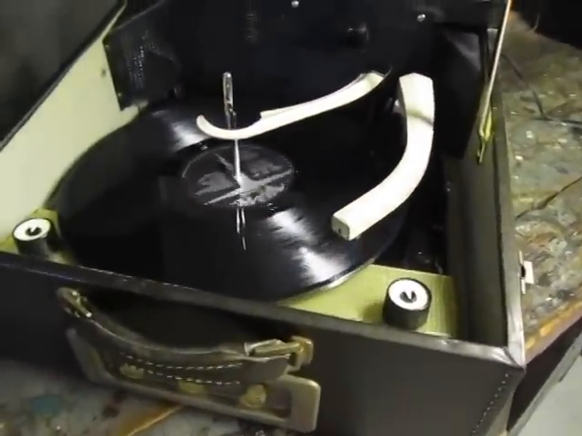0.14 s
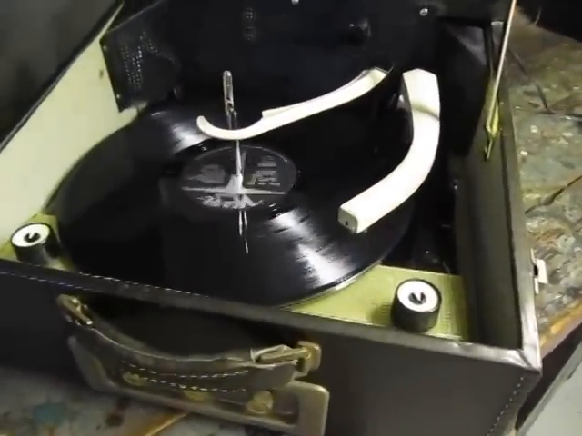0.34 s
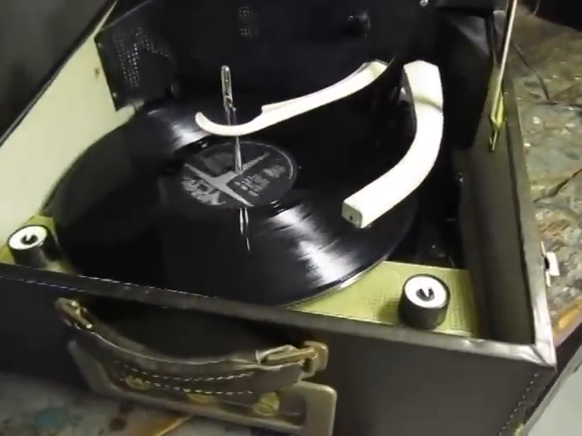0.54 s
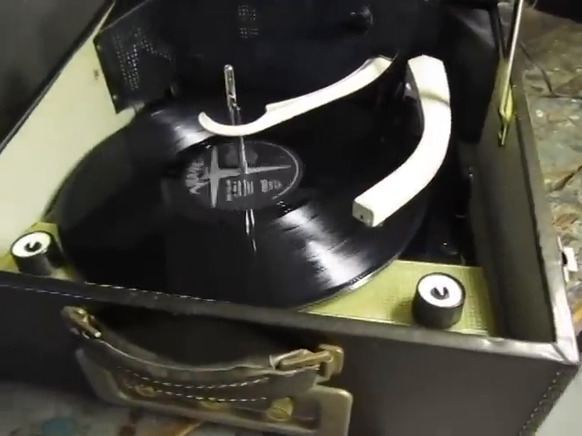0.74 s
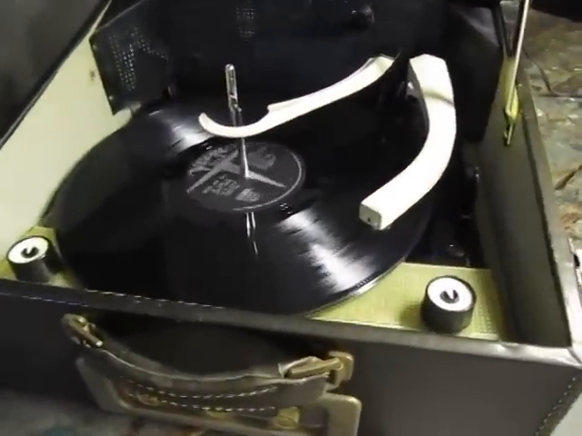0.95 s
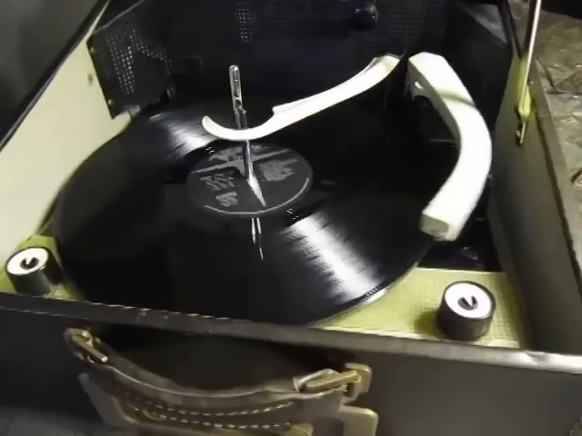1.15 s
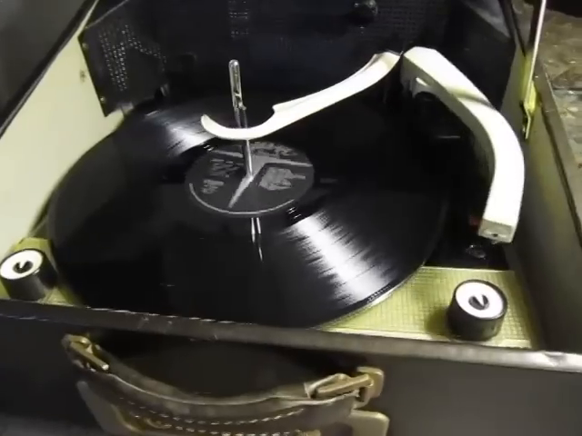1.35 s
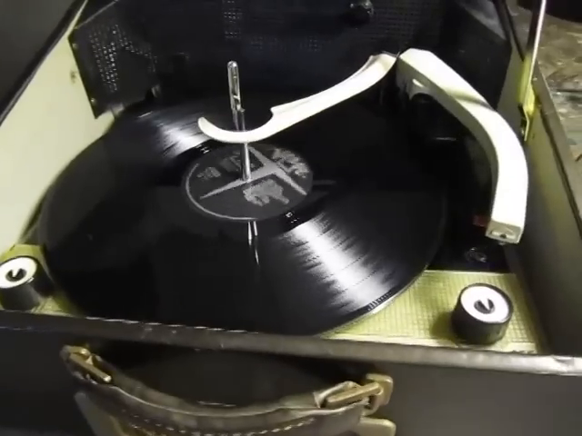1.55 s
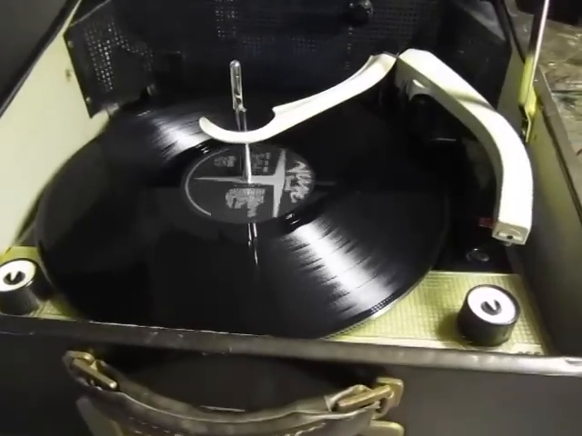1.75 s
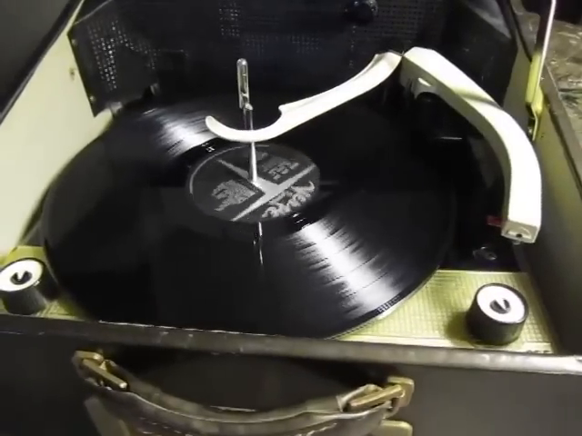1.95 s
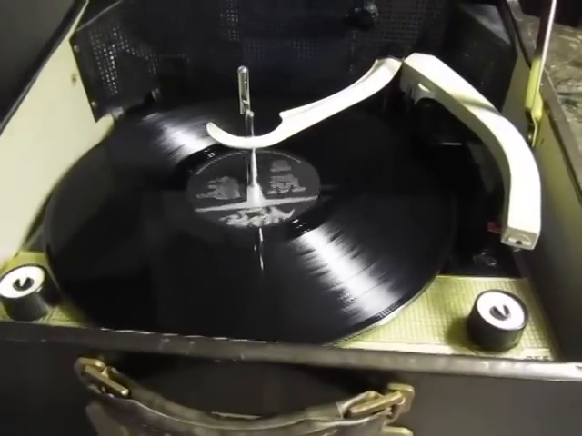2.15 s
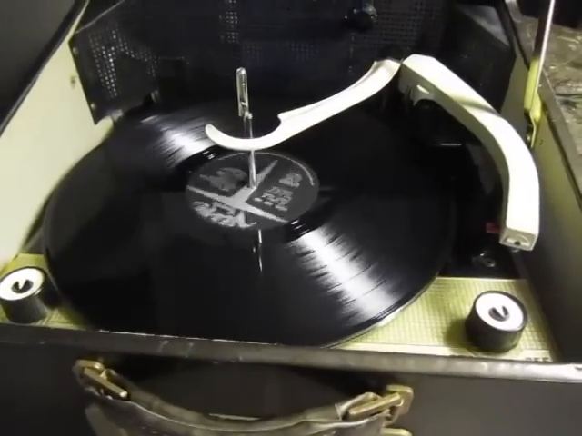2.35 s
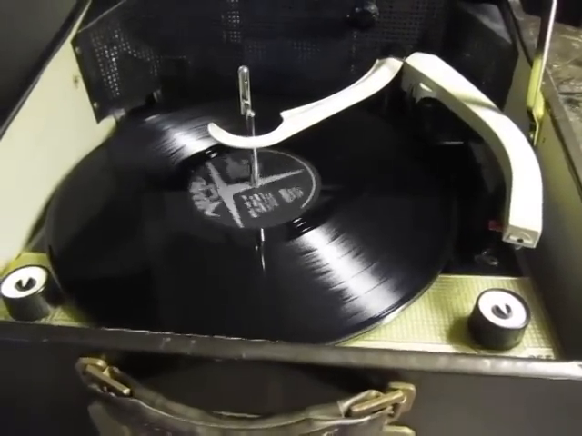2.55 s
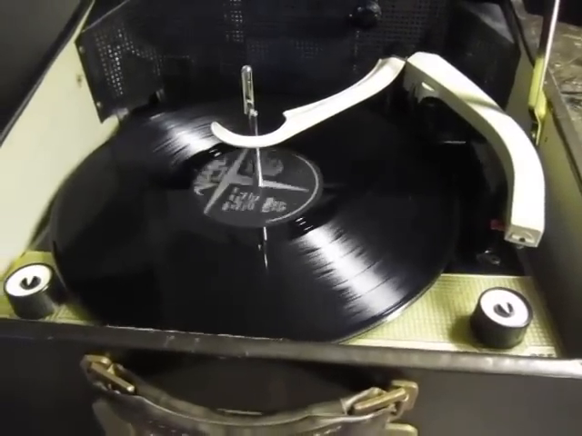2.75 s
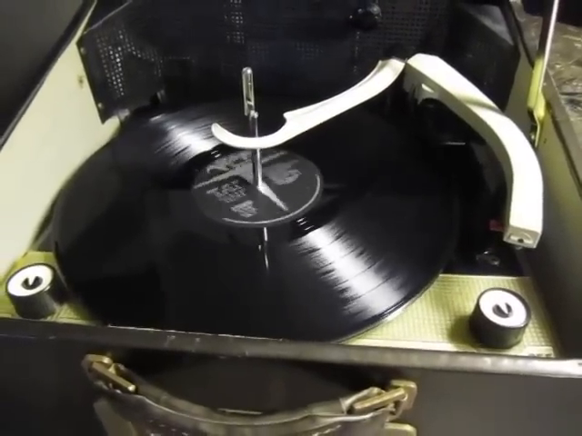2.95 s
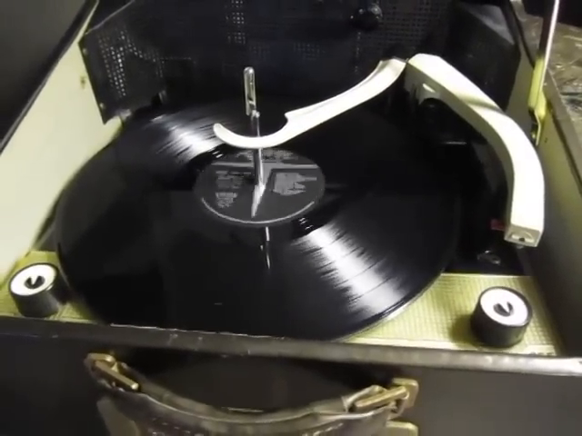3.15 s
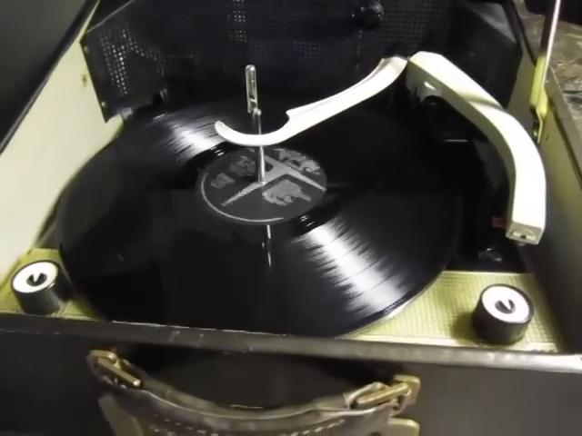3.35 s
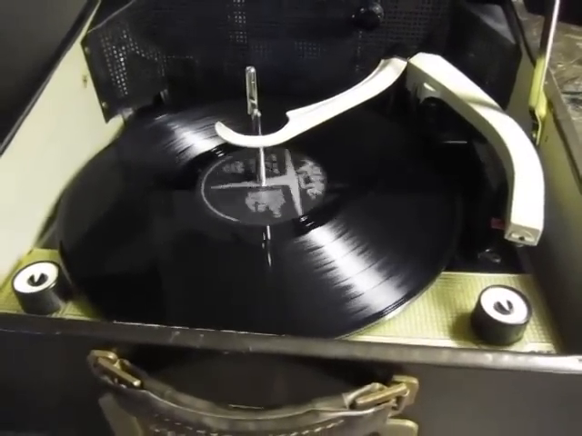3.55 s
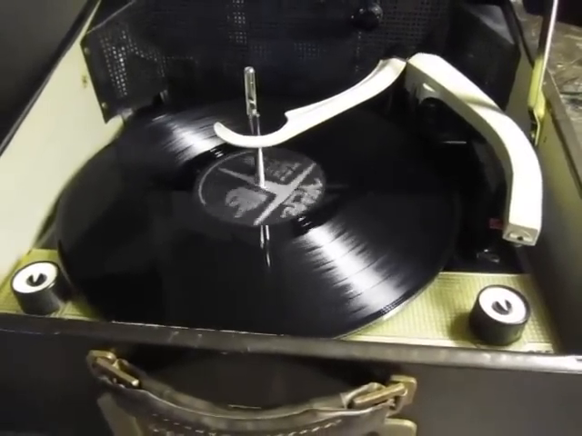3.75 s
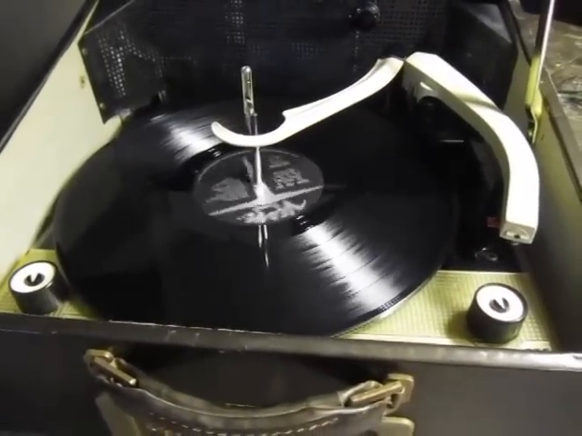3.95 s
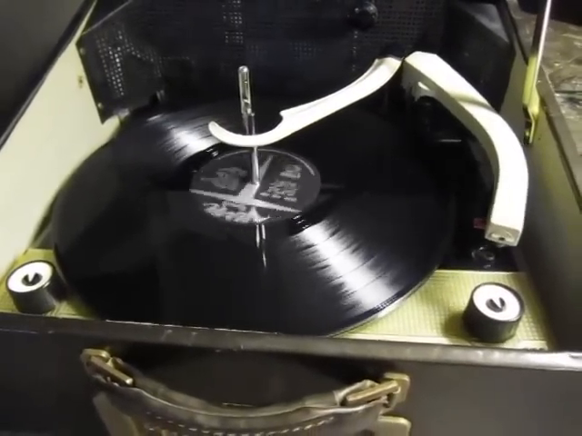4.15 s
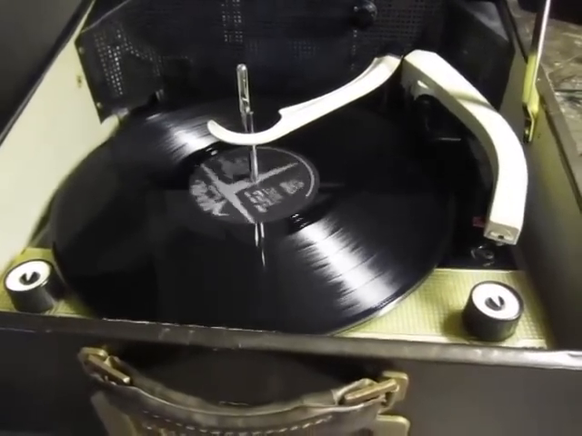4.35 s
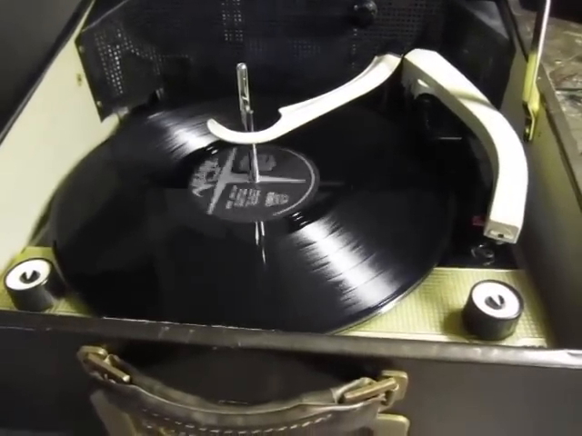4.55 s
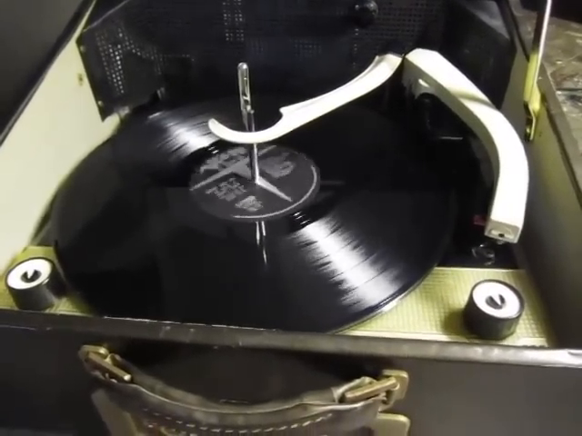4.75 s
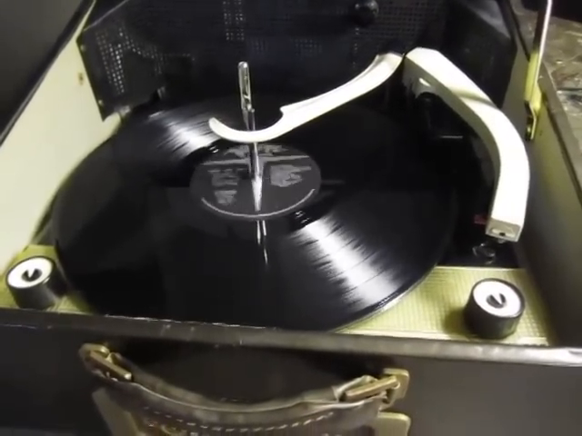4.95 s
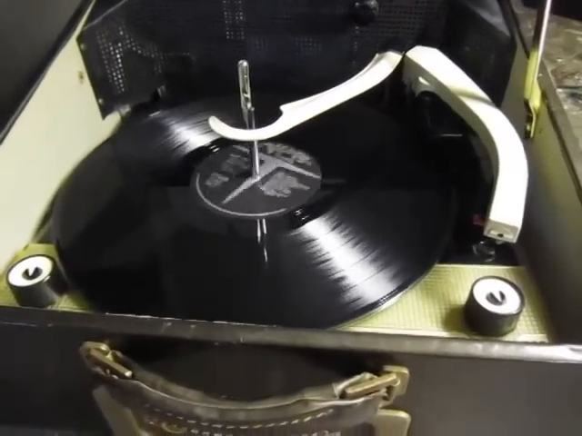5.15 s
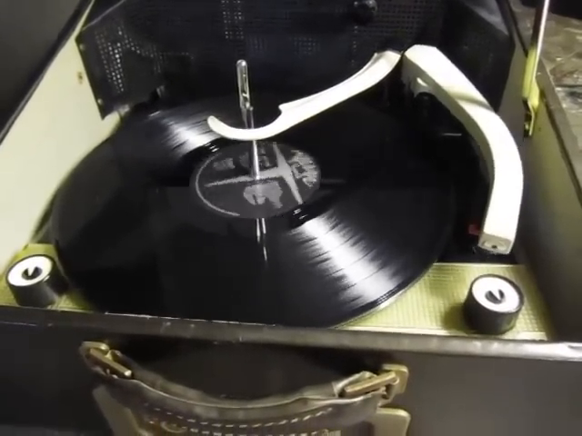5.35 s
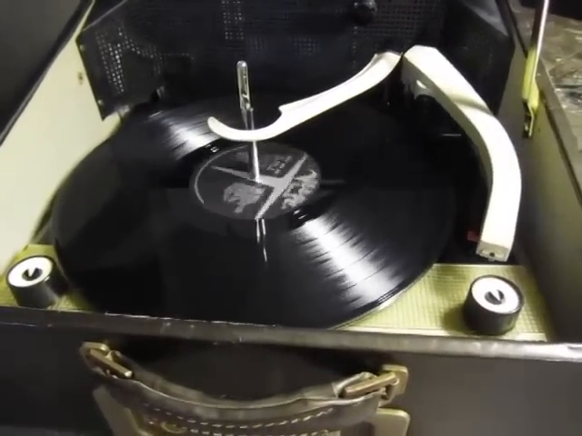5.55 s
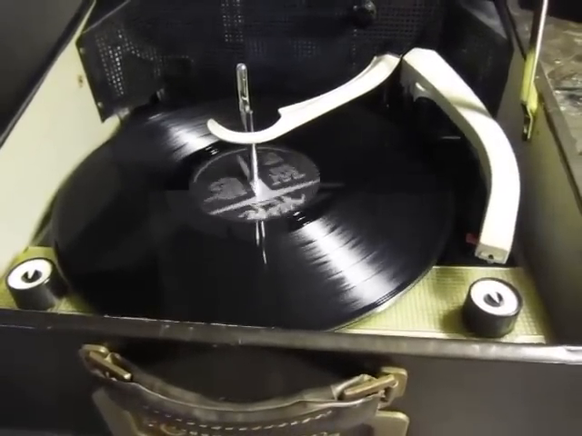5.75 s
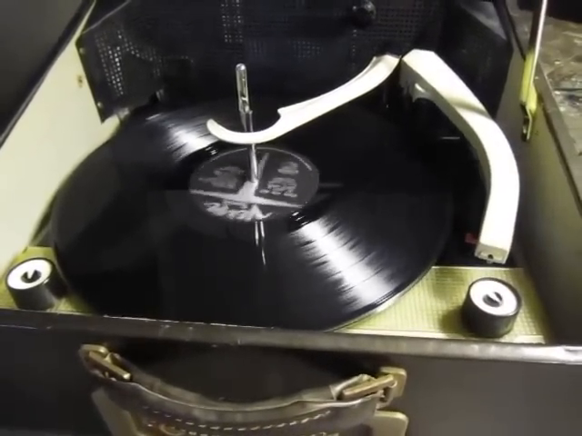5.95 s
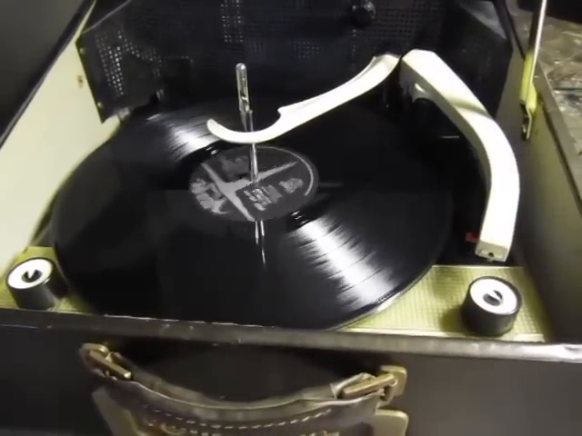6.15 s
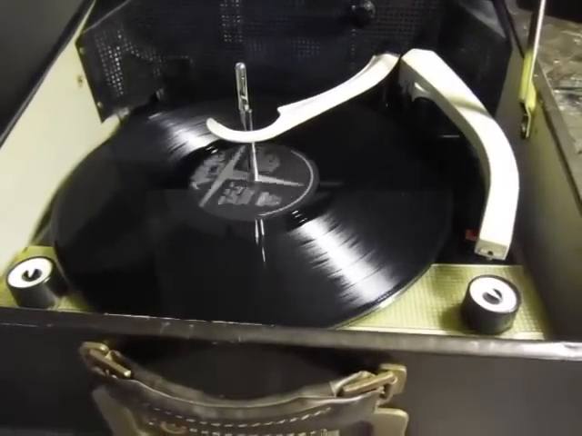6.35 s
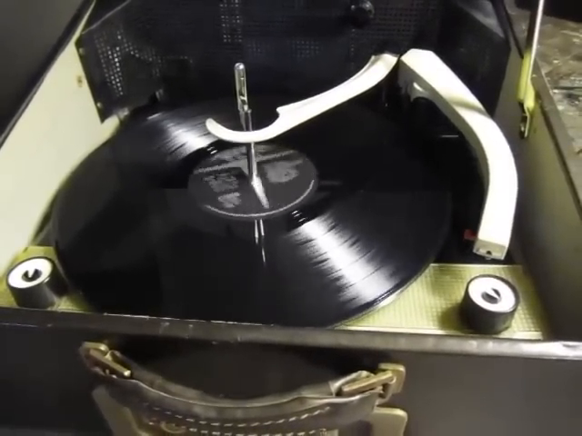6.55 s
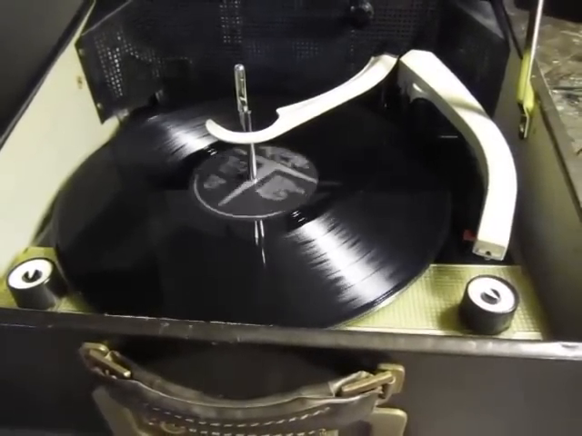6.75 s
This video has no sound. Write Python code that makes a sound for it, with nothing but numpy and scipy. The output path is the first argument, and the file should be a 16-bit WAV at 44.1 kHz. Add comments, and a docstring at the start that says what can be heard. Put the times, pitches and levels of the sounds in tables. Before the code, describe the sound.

Close mechanical clicking of a record changer over low hum and rumble, ending in a hard ringing switch snap, quiet, and small late rattles.

```python
"""Lever contacts of a record changer in a portable case: brief noisy impacts excite the steel deck's modes.
The stylus hiss ends, the arm swings to its rest, and cam, pawls and levers click as the cycle finishes.
Motor hum is a sum of mains harmonics; rumble, scrapes and stylus hiss are filtered noise.
The shut-off lever snaps and rings, the motor stops, and springs and rods ring on as decaying partials.
The coasting platter nudges a last few levers over a faint low room tone."""
import sys
import numpy as np
from scipy import signal
from scipy.fft import rfft, irfft, next_fast_len
from scipy.io import wavfile
from scipy.ndimage import uniform_filter1d, map_coordinates

SR = 44100
rng = np.random.default_rng(int(sys.argv[2]) if len(sys.argv) > 2 else 0)


def put_to_file(sound):
    """Save the sound as 16-bit audio at rate SR, in the file named by the first command-line argument."""
    columns = np.atleast_2d(sound).T  # one column per channel
    safe = np.clip(columns, -1, 1)
    whole_steps = np.round(safe * 32767)
    wavfile.write(sys.argv[1], SR, whole_steps.astype(np.int16))


N = 300214  # length in samples
TRIP_S = 5.984  # the shut-off lever strikes


def amp(db):
    """Level law: decibels to amplitude gain."""
    return 10 ** (np.asarray(db) / 20)


def unit(x):
    """Normalization: scale a signal to rms 1."""
    return x / np.sqrt(np.mean(x ** 2) + 1e-20)


def along(points, hz):
    """Spectral interpolation: (Hz, value) points read on a logarithmic frequency axis."""
    f, v = np.transpose(points)
    return np.interp(np.log(hz + 1), np.log(f + 1), v)


def curve(rows):
    """Envelope interpolation: (s, value) rows as one value per sample."""
    return np.interp(np.arange(N) / SR, *np.transpose(rows))


def wobble(rate):
    """Random modulation: a smooth curve through rate random knots a second."""
    knots = rng.standard_normal(int(N * rate / SR) + 4)
    fine = np.arange(len(knots) * 8) / 8
    smooth = map_coordinates(knots, [fine], mode="nearest")
    return np.interp(np.arange(N) * rate / SR, fine, smooth)


def filtered(x, response):
    """Linear filtering: the spectrum of x times a response of frequency."""
    n = x.shape[-1]
    m = next_fast_len(n + 8192)  # padded so that the tail does not wrap round
    return irfft(rfft(x, m) * response(np.fft.rfftfreq(m, 1 / SR)), m)[..., :n]


def noise(spectrum):
    """Spectral shaping: white noise through a gain of (Hz, dB) points."""
    return filtered(rng.standard_normal(N), lambda hz: amp(along(spectrum, hz)))


def resonances(modes, hz):
    """Damped resonance: summed causal band-pass responses of (Hz, width in Hz, dB) modes."""
    return sum(amp(db) * 1j * hz * w / (c * c - hz * hz + 1j * hz * w) for c, w, db in modes)


def ring(modes, attack):
    """Free vibration: a second of exponentially decaying (Hz, dB, t60) partials."""
    t = np.arange(SR) / SR
    partials = 0
    for hz, db, t60 in modes:
        partials = partials + amp(db - 60 * t / t60) * np.sin(2 * np.pi * (hz * t + rng.random()))
    return partials * (1 - np.exp(-t / attack))


def add(track, s, sound):
    """Superposition: mix a sound into a track from time s."""
    start = max(round(s * SR), 0)
    part = sound[..., :N - start]
    track[..., start:start + part.shape[-1]] += part


def stereo(mid, side):
    """Mid-side stereophony: left and right from the common and the opposed part."""
    return np.array([mid + side, mid - side])


# mains harmonics: pitch_hz [Hz], loaded_db [dB rms before wavering], idle_change_db [dB]
HUM_LINES = [(59.9, -66, -8.5), (118.5, -67, -4), (178.6, -59, -9.5), (235, -71, -3), (539, -66, -12),
             (597, -64, .3)]


def motor(waver_db=1.23, waver_rad=0.18, load_s=1.2, stop_s=0.043):
    """Magnetic hum: wavering mains harmonics, most of them rising under the cam's load until the switch cuts them."""
    t = np.arange(N) / SR
    idling = np.clip(1 - t / load_s, 0, 1)
    lines = 0
    for hz, db, idle_db in HUM_LINES:
        size = amp(db + idle_db * idling + waver_db * wobble(5))
        phase = 2 * np.pi * (hz * t + rng.random()) + waver_rad * wobble(7.7)
        lines = lines + size * np.sin(phase)
    return np.sqrt(2) * lines * np.exp(-np.maximum(t - TRIP_S, 0) / stop_s)


# common part of the rumble's colour: frequency_hz [Hz], relative_db [dB]
RUMBLE_COLOUR = [(25, -25.5), (60, -15.5), (130, -4), (175, -1.5), (290, 2), (420, -3), (650, -3),
                 (1000, -6), (1400, -9.5), (3450, -16), (3720, -23.5), (6000, -21), (9000, -31),
                 (15500, -53.5)]
# diffuse, opposed part of the rumble's colour: frequency_hz [Hz], relative_db [dB]
DIFFUSE_COLOUR = [(25, -20), (60, 1), (170, 11), (280, 9), (500, 3.5), (800, -3), (1500, -9.5),
                  (3400, -19.5), (3750, -27.5), (5800, -22), (9000, -31), (15500, -57.5)]
ENGAGE_S = 1.33  # the cam has taken up its full load
# relative rumble while playing, turning the cam, and coasting
IDLE_DB, LOADED_DB, COAST_DB = -58, -52, -59.5


def drive(level_db=-0.5, flutter_db=1.0, take_up=2.6, run_down_s=0.04, bass_hz=190):
    """Rolling noise: idler, bearing and cam rumble louder under load, then fade and lose bass after shut-off."""
    t = np.arange(N) / SR
    driven = np.exp(-np.maximum(t - TRIP_S, 0) / run_down_s)
    running_db = IDLE_DB + (LOADED_DB - IDLE_DB) * np.minimum(t / ENGAGE_S, 1) ** take_up
    rumble_db = COAST_DB + (running_db - COAST_DB) * driven
    near, diffuse = noise(RUMBLE_COLOUR), noise(DIFFUSE_COLOUR)
    # only the common part is uneven; the wide rush is steady
    rumble = stereo(near * amp(flutter_db * wobble(45)), diffuse) / np.std(near)
    coasting = filtered(rumble, lambda hz: hz ** 2 / (hz ** 2 + bass_hz ** 2))
    return amp(rumble_db + level_db) * (driven * rumble + (1 - driven) * coasting)


# stylus hiss: time_s [s], level_db [dB rms]
GROOVE_HISS = [(0, -74.5), (.95, -68), (1.03, -70), (1.2, -110)]


def stylus(needle_hz=3390, width_hz=260):
    """Resonant excitation: groove noise drives the needle's resonance until the arm lifts."""
    hiss = filtered(rng.standard_normal(N), lambda hz: resonances([(needle_hz, width_hz, 0)], hz) ** 2)
    return amp(curve(GROOVE_HISS)) * unit(hiss)


# filter gain of the low room rumble: frequency_hz [Hz], gain_db [dB]
ROOM_RUMBLE = [(25, -65.5), (130, -49.5), (250, -54), (900, -110)]


def room_tone():
    """Diffuse background: independent low noise in each channel, which stays when the motor has stopped."""
    return np.array([noise(ROOM_RUMBLE), noise(ROOM_RUMBLE)])


# lever contacts: time_s [s], strength_db [relative dB], hardness [0-1], case_thump_db [relative dB],
# peak_delay_s [s, rise of the chatter], part_pitch_hz [Hz, the struck part], part_prominence_db [dB]
LEVER_CONTACTS = [(1.002, -44, 0.66, -50, 0.0043, 2900, 1), (1.027, -41, 0.57, -52, .0026, 2900, 5.5),
                  (1.031, -51, .4, -38.5, 0.0026, 270, 12), (1.111, -51, 0.11, -65, 0.0011, 930, 5.5),
                  (1.166, -46.5, 0.34, -54, .002, 780, 7.5), (1.214, -24, 0.77, -30, 0.003, 740, 10.5),
                  (1.2223, -23.5, 0.86, -26, 0.0031, 544, 13.5),
                  (1.236, -43, 0.5, -32.5, 0.0028, 130, 12.5), (1.264, -35, .76, -34, .004, 1620, 9),
                  (1.308, -28, 0.94, -39, 0.0041, 560, 14.5), (1.394, -37, 0.65, -42, 0.0049, 1930, 4),
                  (1.4362, -41, 0.88, -45, 0.0018, 1990, 5), (1.4513, -33.5, 0.84, -35.5, 0.0017, 1950, 7),
                  (1.629, -41, 0.84, -50, 0.004, 1900, 12), (1.654, -39, 0.86, -49, 0.0019, 2590, 6),
                  (1.724, -26.5, .91, -47, 0.0036, 1580, 0.5), (1.931, -42, 0.76, -57, 0.0018, 2490, 10),
                  (2.8657, -38, 0.86, -43, 0.0031, 1010, 12), (3.329, -38.5, 0.62, -42, 0.0037, 890, 12),
                  (3.8458, -45, 0.15, -48, 0.0014, 990, 9.5), (4.049, -45.5, 0.37, -45, 0.0033, 1020, 5.5),
                  (4.098, -39, 0.42, -41, 0.0019, 170, 9.5), (4.1318, -49, 0.84, -38, 0.0084, 574, 17),
                  (4.1605, -40, 0.22, -40, 0.0012, 1450, 5.5), (4.17, -43, 0.27, -40, 0.0034, 660, 11),
                  (4.372, -53, 0.04, -65, 0.0017, 850, 8.5), (4.4307, -18.5, 0.92, -44, 0.0049, 7500, 9.5),
                  (4.4418, -15.5, 0.83, -38.5, 0.0043, 340, 11), (4.4436, -25, 0.22, -49, 0.002, 980, 7.5),
                  (4.46, -27, 0.94, -40, 0.0027, 1560, 8), (4.9393, -33.5, 0.88, -64.5, 0.0055, 4540, 5.5),
                  (5.147, -32, 0.79, -31.5, 0.0019, 1540, 12), (5.336, -29.5, 0.59, -43, 0.0035, 977, 4),
                  (5.343, -32.5, 0.6, -59.5, 0.002, 1850, 13),
                  (5.511, -46.5, 0.78, -50.5, 0.0024, 2570, 14),
                  (5.6823, -43.5, 0.45, -51.5, 0.0024, 1640, 9),
                  (5.7787, -28, 0.51, -45, 0.0052, 1720, 12.5), (5.9837, -17, 0.9, -37, 0.0013, 1035, -0.5),
                  (5.9857, -5, 0.91, -36, 0.0019, 2900, 5.5), (5.9935, -17, 0.81, -37.5, 0.0033, 1035, 3.5),
                  (6.004, -29, 1, -45.5, 0.0028, 6000, 4.5), (6.028, -30.5, 1, -59, 0.0048, 6500, 2),
                  (6.54, -24.5, 0.79, -66, 0.0043, 3150, 6), (6.569, -32, 0.7, -68.5, 0.005, 1750, 14),
                  (6.582, -26, 0.75, -63.5, 0.0032, 1790, 10),
                  (6.6769, -37.5, 0.75, -46, 0.0026, 806, 14.5), (6.687, -57.5, 0.1, -61.5, .004, 280, 20)]
# deck and case resonances: pitch_hz [Hz], relative_db [dB], t60_s [s]
DECK_MODES = [(120, -19, 0.072), (176, -7.5, 0.081), (269.8, -3.5, .08), (562, -8, 0.041), (715, -6, 0.066),
              (806, -0.5, .03), (984, -1, 0.039), (1270, -7.5, 0.022), (1467, -2.5, 0.072),
              (1688, -5.5, .03), (1888, 1.5, 0.056), (2335, -1, 0.045), (2500, -1, 0.039), (2577, 0.5, .04),
              (2880, -3, 0.037), (3180, -6.5, 0.042), (4600, -15, 0.084), (5060, -7, 0.055),
              (5190, -5, .035), (5506, -7, .05), (6250, -1, 0.025), (7100, -11, .04), (7570, -7, 0.033),
              (8400, -12.5, .04)]
# colour of the unpitched part of a contact: frequency_hz [Hz], relative_db [dB]
CHATTER_COLOUR = [(30, -10.5), (120, 3.5), (400, 8), (900, 18.5), (3200, 17), (3900, 8), (6500, 15),
                  (8500, 6.5), (11500, -0.5), (13500, -14.5), (15500, -22.5)]
# dull knock and bright snap relative to the strength, at hardness 0 and 1
SOFT_KNOCK_DB, HARD_KNOCK_DB = 6, -17.5
SOFT_SNAP_DB, HARD_SNAP_DB = -57.5, -4


def contacts(lead_s=.0024, vary_db=3.0, thump_db=-4, clack_db=-9.5, shine_db=-9, shine_gain=0.097,
             shine_rise_db=36, rebound_s=.014, rebound_db=-17, part_width=0.17, detune=0.0073):
    """Impact excitation: chatter rings deck and struck part; returns whole blows and unpitched chatter alone."""
    _, strength, hardness, thump, peak_s, part_hz, part_db = np.transpose(LEVER_CONTACTS)
    count = len(LEVER_CONTACTS)
    t = np.arange(SR // 10) / SR
    u = t / np.maximum(peak_s[:, None], 5e-4)
    bursts = rng.standard_normal((2, count, len(t))) * u * np.exp(-u)
    chatter = filtered(bursts, lambda hz: amp(along(CHATTER_COLOUR, hz)))

    hz, db, t60 = np.transpose(DECK_MODES)
    modes = amp(-60 * t / t60[:, None]) * np.exp(2j * np.pi * hz[:, None] * t)
    # the moving linkage loads the deck differently each time
    stretch = 1 + detune * rng.standard_normal(count)
    # every blow lands elsewhere, so the modes share it differently
    shape = count, len(DECK_MODES)
    shares = amp(db + vary_db * rng.standard_normal(shape)) * np.exp(2j * np.pi * rng.random(shape))
    waves = (shares @ modes).imag
    ringing = np.array([np.interp(k * t, t, wave) for k, wave in zip(stretch, waves)])
    ringing = ringing * (1 - np.exp(-2 * u ** 2))
    struck = np.array([ringing + chatter[0], chatter[1]])

    knock = strength + SOFT_KNOCK_DB + hardness * (HARD_KNOCK_DB - SOFT_KNOCK_DB)
    snap = strength + SOFT_SNAP_DB + hardness * (HARD_SNAP_DB - SOFT_SNAP_DB)
    # harder blows reach higher
    shine = snap + shine_gain * (snap - snap.mean()) - shine_rise_db * (1 - hardness)
    levels = [thump + thump_db, knock, strength + clack_db, snap, shine + shine_db]
    bands_hz = [(70, 400), (400, 1200), (1200, 3600), (3700, 9000), (9000, 16000)]
    blows = 0
    for band_hz, level in zip(bands_hz, levels):
        part = signal.sosfilt(signal.butter(3, band_hz, "band", fs=SR, output="sos"), struck)
        peak = np.sqrt(uniform_filter1d(part ** 2, size=220).max(axis=-1, keepdims=True))  # 5 ms rms
        blows = blows + part / peak * amp(level)[:, None]

    part_mode = [(part_hz[:, None], part_width * part_hz[:, None], 0)]
    own_ring = filtered(blows, lambda hz: resonances(part_mode, hz))
    blows = blows + (amp(part_db)[:, None] - 1) * own_ring

    track = np.zeros((2, N))
    for k, row in enumerate(LEVER_CONTACTS):
        add(track, row[0] - lead_s, blows[:, k])
        # away from the shut-off every contact gets a weak rebound;
        # the shut-off lever's own bounces are rows in the table
        if abs(row[0] - TRIP_S) > .05:
            add(track[0], row[0] + rebound_s, amp(rebound_db) * blows[1, k])
    return track


# reverberation of the small room: frequency_hz [Hz], t60_s [s]
ROOM_DECAY = [(100, 0.3), (1000, 0.47), (5000, 0.2), (14000, .11)]


def tail(x, decay, side_db, build_s, size=256):
    """Diffuse reverberation: the energy of x builds up, then dies at each frequency's own speed."""
    hz, t, z = signal.stft(x, SR, nperseg=size)
    fading = amp(-60 * t / along(decay, hz)[:, None]) ** 2 * (1 - np.exp(-t / build_s)) ** 2
    fading = fading / fading.sum(axis=1, keepdims=True)
    fed = uniform_filter1d(np.abs(z) ** 2, size=2, axis=0)
    energy = np.abs(signal.fftconvolve(fed, fading, axes=1)[:, :len(t)])
    field = signal.stft(rng.standard_normal((2, N)), nperseg=size)[2]
    mid, side = signal.istft(field / np.std(field) * np.sqrt(energy), nperseg=size)[1][:, :N]
    return stereo(mid, amp(side_db) * side)


# decay of the steel linkage: frequency_hz [Hz], t60_s [s]
STEEL_DECAY = [(100, .3), (700, 1.6), (3400, 1.3), (3800, 0.8), (9000, 0.47), (14000, .21)]


def linkage(x, count=640, low_hz=480, high_hz=14000, level_db=-24.0, side_db=-11.5, size=256):
    """Modal density: the blows set the steel rods and springs ringing on in many fine, close partials."""
    place = (np.arange(count) + rng.random(count)) / count
    partial_hz = low_hz + (high_hz - low_hz) * place ** 2
    lines = np.zeros((2, SR // 2 + 1), complex)  # one bin per hertz
    lines[:, partial_hz.astype(int)] = np.sqrt(place) * np.exp(2j * np.pi * rng.random((2, count)))
    hz, t, z = signal.stft(irfft(lines), SR, nperseg=size)
    t60 = along(STEEL_DECAY, hz)[:, None]
    response = signal.istft(z * amp(-60 * t / t60) / np.sqrt(t60), nperseg=size)[1]
    response = response / np.linalg.norm(response[0])
    mid, side = signal.fftconvolve(x[None], response, axes=1)[:, :N]
    return amp(level_db) * stereo(mid, amp(side_db) * side)


def steel_ring(count=80, low_hz=3300, high_hz=11000, level_db=-39, fall_db=-7, t60=0.16, scatter_db=4):
    """Modal ringing: hard contacts set small springs and washers ringing; fall_db is per octave."""
    t = np.arange(SR // 2) / SR
    hz = np.linspace(low_hz, high_hz, count) * (1 + .01 * rng.standard_normal(count))
    decay = amp(fall_db * np.log2(hz / low_hz)[:, None] - 60 * t / t60)
    partials = decay * np.sin(2 * np.pi * (hz[:, None] * t + rng.random((count, 1))))
    track = np.zeros(N)
    for s, strength, hardness, *_ in LEVER_CONTACTS:
        softness_db = (1 - hardness) * (SOFT_SNAP_DB - HARD_SNAP_DB) / 2
        shares = amp(strength + level_db + softness_db + scatter_db * rng.standard_normal(count))
        add(track, s, shares @ partials)
    return track


# partials of the arm's spring: pitch_hz [Hz], relative_db [dB], t60_s [s]
SPRING_MODES = [(1460, 0, .09), (1468, -18, .75), (1522, -4, .06), (1626, -7, .06), (1905, -10, .06)]
# the slack spring is jolted or slaps back: start_s [s], strength_db [relative dB]
SPRING_JOLTS = [(1.001, -41.5), (1.023, -44), (1.216, -25.5), (1.26, -32), (1.277, -36), (1.392, -52),
                (1.437, -43), (1.45, -38), (1.543, -48), (2.868, -43), (5.146, -35), (5.231, -46.5),
                (5.427, -51), (5.615, -50.5), (5.691, -50.5), (5.865, -50)]


def spring(detune=0.005, vary_db=2.5, attack_s=0.0012):
    """Spring vibration: each jolt makes detuned partials, modulated as the slack spring flutters on its seat."""
    track = np.zeros(N)
    for s, db in SPRING_JOLTS:
        modes = []
        for hz, level, t60 in SPRING_MODES:
            pitch_hz = hz * (1 + detune * rng.standard_normal())
            modes.append((pitch_hz, db + level + vary_db * rng.standard_normal(), t60))
        add(track, s, ring(modes, attack_s))
    seat = np.clip(1 + .35 * wobble(45), .4, 1.4)
    buzz = 1 + .45 * wobble(220)
    return track * seat * buzz


# colour of the gear ticks: frequency_hz [Hz], gain_db [dB]
GEAR_COLOUR = [(200, -5), (950, 11), (1250, 7), (2600, 6), (3400, 1), (4200, -12), (12000, -35)]


def gear_ticks(count=110, level_db=-66, load_db=4):
    """Gear meshing: faint irregular noise ticks grow as the cam winds up the springs."""
    t = np.arange(SR // 40) / SR
    track = np.zeros(N)
    first = LEVER_CONTACTS[0][0]
    for turn in rng.random(count):
        size = amp(level_db + load_db * turn)
        tick = size * amp(-60 * t / .035) * rng.standard_normal(len(t))
        add(track, first + turn * (TRIP_S - first), tick)
    return filtered(track, lambda hz: amp(along(GEAR_COLOUR, hz)))


def strokes(rows, colour, grain_db):
    """Sliding friction: grainy coloured noise under bell-shaped pressure of (s, half length s, dB) rows."""
    t = np.arange(N) / SR
    pressure = sum(amp(db) * np.exp(-.5 * ((t - s) / length) ** 2) for s, length, db in rows)
    return pressure * unit(noise(colour) * amp(grain_db * wobble(250)))


# cam follower sliding: centre_s [s], half_length_s [s], level_db [dB]
CAM_SCRAPES = [(1.178, 0.0055, -55), (2.597, 0.046, -63), (4.785, 0.017, -56.5), (4.878, 0.0069, -57),
               (5.827, 0.0041, -58)]
# colour of the scrapes: frequency_hz [Hz], relative_db [dB]
SCRAPE_COLOUR = [(1000, -20), (2500, 7), (4000, -7), (7000, -0.5), (10500, -20.5), (15000, -36)]
# the arm's lifting lever dragging: centre_s [s], half_length_s [s], level_db [dB]
LEVER_RUBS = [(4.13, 0.025, -46), (4.172, 0.011, -42), (4.445, 0.0056, -32.5)]
# colour of the rubs: frequency_hz [Hz], relative_db [dB]
RUB_COLOUR = [(50, -26), (100, -6), (400, 3), (700, -1.5), (1800, -8), (3500, -39), (9000, -53)]
SQUEAL_S, SQUEAL_LENGTH_S, SQUEAL_DB = 1.31, .5, -78  # the arm's pivot
SQUEAL_START_HZ, SQUEAL_END_HZ, SQUEAL_SAG_S = 11850, 10300, 0.1


def friction(waver_hz=25, attack_s=.05, release_s=.25):
    """Dry friction: follower scrapes, dull arm drags, and a thin pivot squeal that sags as the arm slows."""
    t = np.maximum(np.arange(N) / SR - SQUEAL_S, 0)
    sag = np.exp(-t / SQUEAL_SAG_S)
    hz = SQUEAL_END_HZ + (SQUEAL_START_HZ - SQUEAL_END_HZ) * sag + waver_hz * wobble(80)
    pressure = np.clip(np.minimum(t / attack_s, (SQUEAL_LENGTH_S - t) / release_s), 0, 1)
    squeal = amp(SQUEAL_DB) * pressure * np.sin(2 * np.pi * np.cumsum(hz) / SR)
    scrapes = strokes(CAM_SCRAPES, SCRAPE_COLOUR, grain_db=6.0)
    rubs = strokes(LEVER_RUBS, RUB_COLOUR, grain_db=5.5)
    return scrapes + rubs + squeal


# loose levers are shaken and rattle on: start_s [s], level_db [dB], t60_s [s]
LEVER_SHAKES = [(1.224, -37.5, 0.29), (2.44, -58, .9), (4.447, -36, 0.21), (6.583, -43, 0.38)]
# what the loose levers ring with: pitch_hz [Hz], relative_db [dB]
LEVER_MODES = [(560, -5.5), (995, 0.5), (1470, -4), (1855, -1), (2385, -4), (2765, -1)]


def rattle(taps_per_s=260, scatter_db=4.0, width_hz=45):
    """Random impact train: loose levers tap each other quickly and irregularly, ever more weakly."""
    t = np.arange(N) / SR
    taps = (rng.random(N) < taps_per_s / SR) * amp(scatter_db * rng.standard_normal(N))
    modes = [(centre, width_hz, db) for centre, db in LEVER_MODES]
    top_hz = LEVER_MODES[-1][0]  # the treble falls off above the highest mode
    ringing = filtered(taps, lambda hz: resonances(modes, hz) / (1 + (hz / top_hz) ** 4))
    shaking = sum((t > s) * amp(db - 60 * np.abs(t - s) / t60) for s, db, t60 in LEVER_SHAKES)
    return shaking * unit(ringing)


# the shut-off lever's ring: pitch_hz [Hz], relative_db [dB], t60_s [s]
SWITCH_MODES = [(94, -50, .4), (262, -29, .11), (440, -52, .6), (719, -56, 1.1), (988, -53, 1),
                (1030, -22, .08), (1893, -28, .08), (2363, -18, .08), (2478, -27, .09), (2903, -24, .08),
                (3050, -28, .09), (3216, -22, .08), (5120, -33, .14), (6100, -23, .08), (6212, -33, .15)]
# a small clip on the lever rings freely until it is damped
PING_HZ, PING_DB, PING_T60, PING_FREE_S, PING_DAMP_S = 11660, -41, .38, 0.091, .035


def shut_off(lever_db=3.5, attack_s=.003):
    """Modal response: the shut-off lever rings, rocks the sprung deck and sets off a thin, high ping."""
    t = np.arange(SR) / SR
    damping = np.exp(-np.maximum(t - PING_FREE_S, 0) / PING_DAMP_S)
    ping = amp(PING_DB - 60 * t / PING_T60) * damping * np.sin(2 * np.pi * PING_HZ * t)
    track = np.zeros(N)
    add(track, TRIP_S, amp(lever_db) * ring(SWITCH_MODES, attack_s) + ping)
    return track


# side signal of the contacts: frequency_hz [Hz], side_gain_db [dB]
CONTACT_WIDTH = [(100, -18.5), (600, -21), (2500, -20), (5000, -9), (8000, -9), (12000, -2.5)]


def scene():
    """Superposition of sources: the changer close by in a small room."""
    clicks, chatter = contacts()
    width = filtered(chatter, lambda hz: amp(along(CONTACT_WIDTH, hz)))
    room = amp(-12.0) * tail(clicks, ROOM_DECAY, side_db=-12.0, build_s=0.0012)
    metal = linkage(clicks) + steel_ring() + spring() + rattle() + shut_off()
    machine = friction() + gear_ticks() + motor() + stylus() + drive()
    return stereo(clicks, width) + room + metal + machine + room_tone()


TOP_HZ = 15650  # band limit


def record(dry, balance_db=0.14):
    """Saturation and band limiting: right slightly stronger, the loudest snap just overloads, the top is cut."""
    x = dry * amp([[-balance_db], [balance_db]])
    x = x / (1 + np.abs(x / .92) ** 8) ** (1 / 8)
    return filtered(x, lambda hz: hz < TOP_HZ)


dry = scene()
out = record(dry)
put_to_file(out)
```